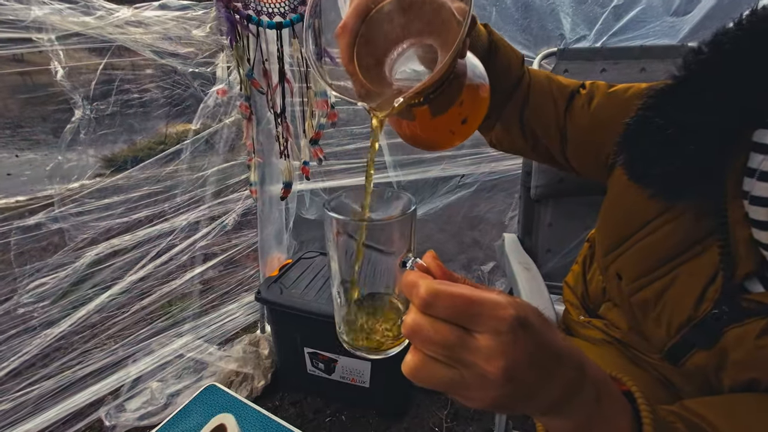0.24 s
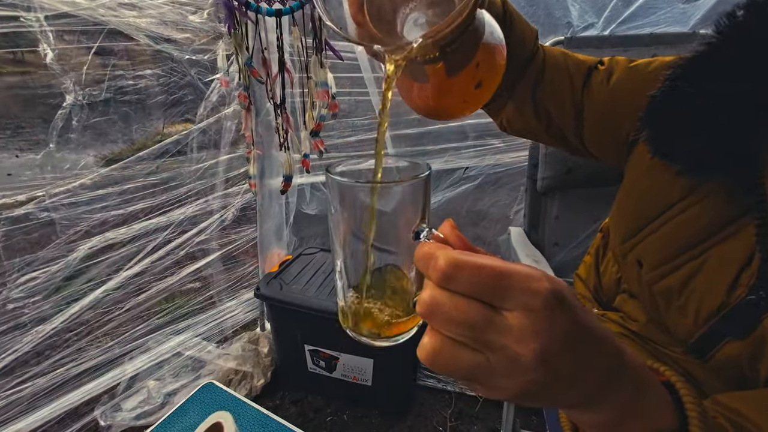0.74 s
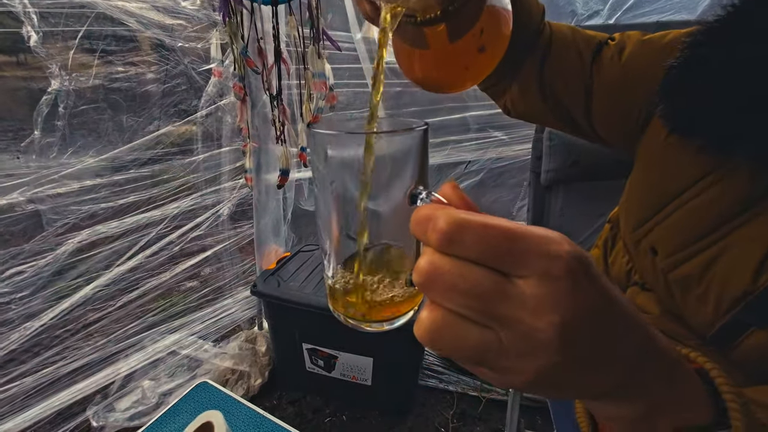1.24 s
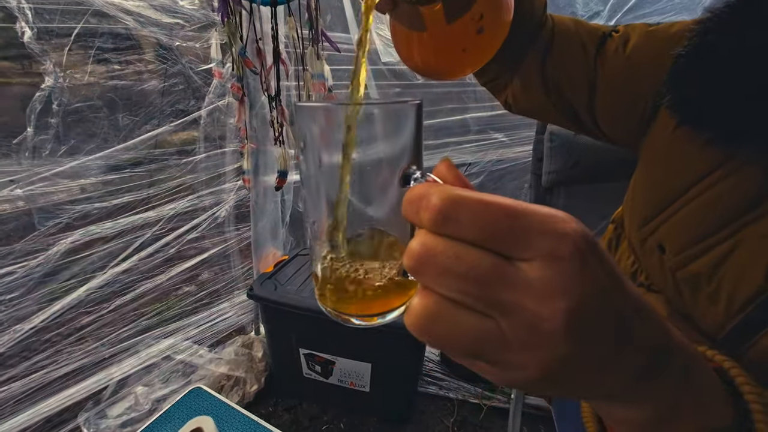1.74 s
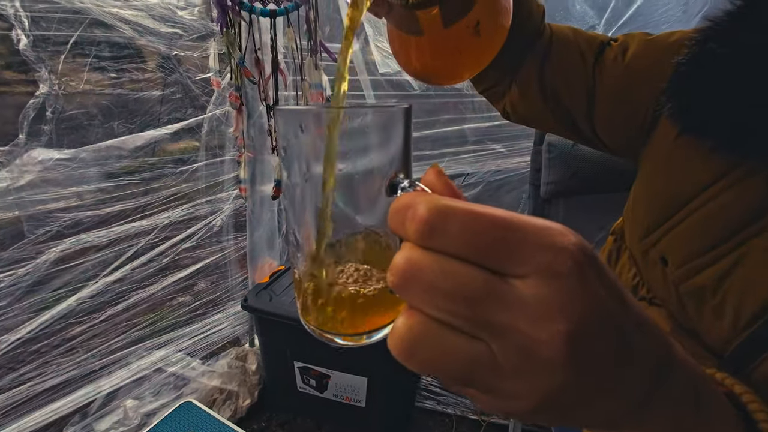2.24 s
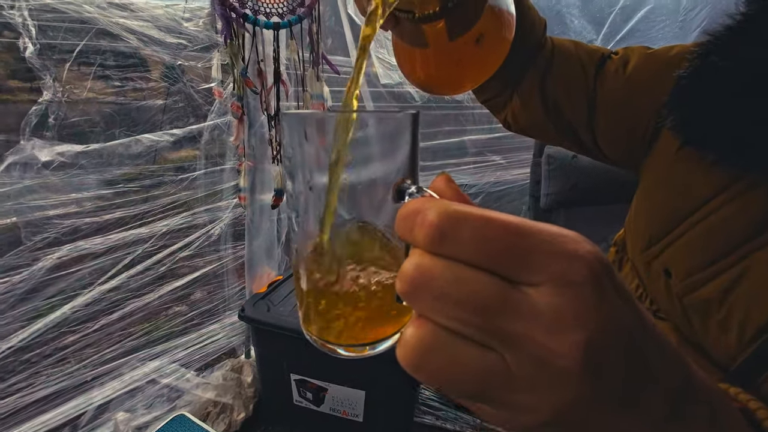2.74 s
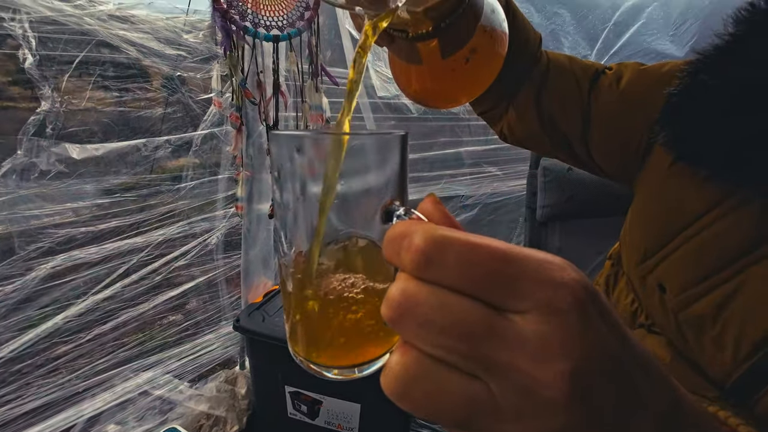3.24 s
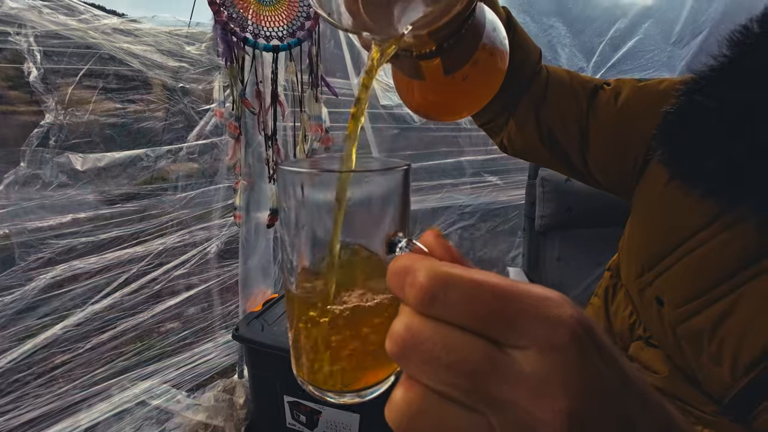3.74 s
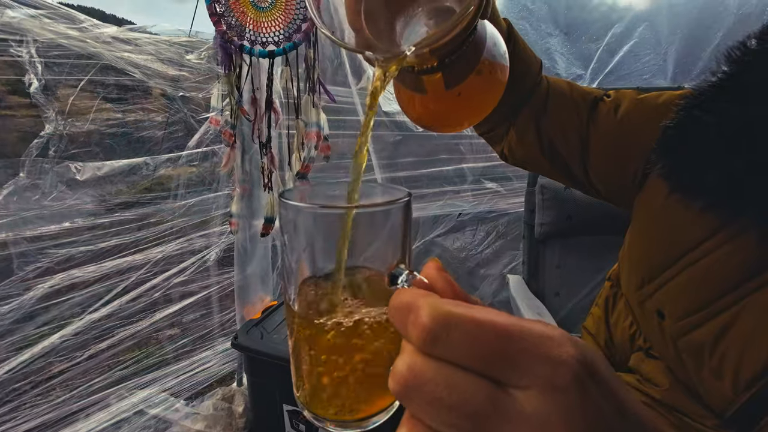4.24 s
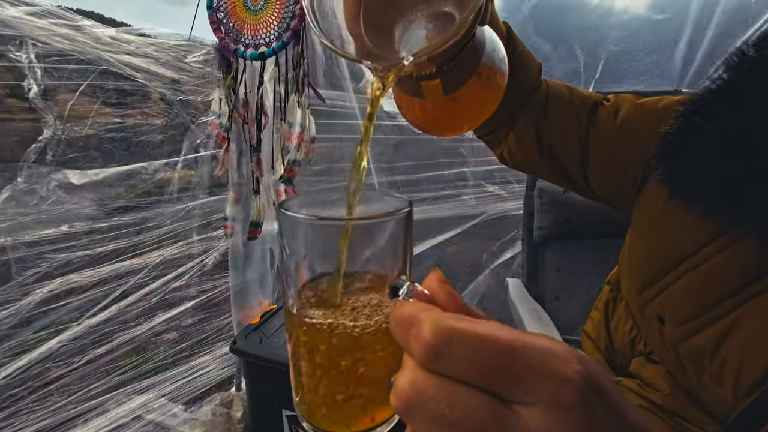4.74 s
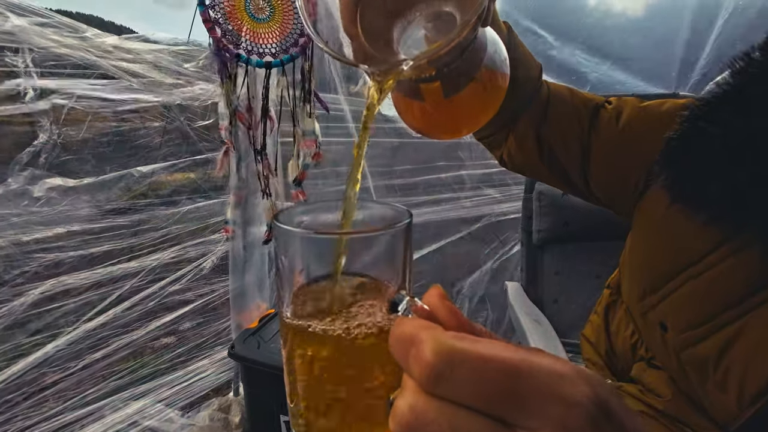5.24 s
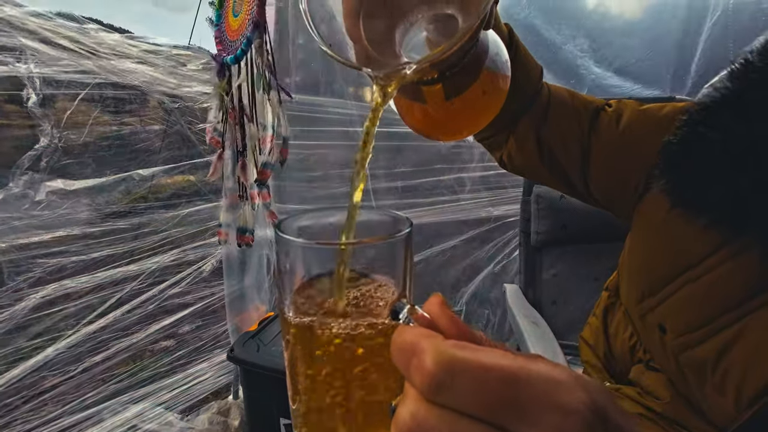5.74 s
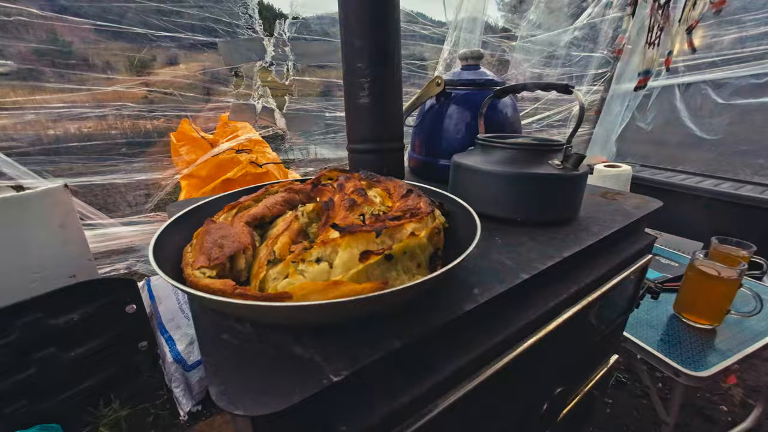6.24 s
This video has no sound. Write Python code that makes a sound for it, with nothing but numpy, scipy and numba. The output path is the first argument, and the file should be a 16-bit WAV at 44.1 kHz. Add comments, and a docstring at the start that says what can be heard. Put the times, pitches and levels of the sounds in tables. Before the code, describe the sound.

A close stream of tea bubbles and splashes into a glass mug over low wind rumble and rustling plastic.

```python
"""Tea pours from a glass pot into a glass mug, in a plastic-sheet shelter, over a low wind rumble. The stream
traps bubbles that ring the air above the tea; its pitch rises as the mug fills. Drops tick throughout the pour,
and at 1.2 s the glass clinks faintly. From about 3 s a gust sets the sheeting rustling, then eddies thump the
microphone. The sheeting snaps taut at 4.6 s. The pouring sounds break off abruptly at 6.3 s; the wind carries
on."""
import sys
import numpy as np
from scipy import signal
from scipy.fft import rfft, irfft, next_fast_len
from scipy.io import wavfile
from numba import njit

SR = 44100
rng = np.random.default_rng(int(sys.argv[2]) if len(sys.argv) > 2 else 0)


def wrap_up_sound(samples):
    """Save the sound to the file named by the first command line argument, as 16-bit audio."""
    columns = np.atleast_2d(samples).T
    # keep every value between -1 and 1, then stretch to whole-number steps
    tamed = np.clip(columns, -1, 1)
    steps = np.round(tamed * 32767).astype(np.int16)
    wavfile.write(sys.argv[1], SR, steps)


N = 286209
TIME_S = np.arange(N) / SR

# wind strength on the shelter: time_s, level_db
WIND_STRENGTH = [(0, 1), (.2, 1.5), (.75, 0.5), (.97, -1), (1.75, -2.5), (2.2, -1.5), (2.58, -2.5),
                 (2.8, 2), (3.03, 7), (3.24, 12.5), (3.56, 4.5), (3.72, 9.5), (4.2, 8.5), (4.5, 13.5),
                 (4.9, 15), (5.5, 14.5), (5.8, 11), (6.14, 13.8), (6.35, 10.5), (6.49, 13)]
# puffs at the microphone: centre_s, rise_db, half_length_s
WIND_PUFFS = [(0.277, 3, 0.067), (0.623, 4, 0.43), (1.6, 4, 0.43), (2.92, 7, 0.09), (3.38, 4.5, 0.16),
              (3.9, 8, 0.12), (4.493, 10, 0.054), (4.895, 9, 0.034), (5.04, 9.5, 0.078),
              (5.375, 4.5, 0.037), (5.885, 6, 0.044), (6.4, 10, .1)]
# noise spectrum shapes: freq_hz, density_db
BUFFET_SPECTRUM = [(2, -25), (9, 0), (16, 2), (25, 0), (39, -2), (50, -7), (75, -13), (120, -25),
                   (300, -55)]
EDDY_SPECTRUM = [(40, 1.5), (80, -11), (120, -2), (180, -6), (280, -9.5), (450, -17), (900, -31.5),
                 (2500, -75)]
ROAR_SPECTRUM = [(150, 0.5), (350, 6), (600, 6.5), (1200, 6), (2000, 0.5), (3000, -2), (5000, -19),
                 (10000, -41.5)]
RUSTLE_SPECTRUM = [(800, -27), (2000, 3), (3200, 2.5), (5000, -0.5), (7000, -1), (10000, -6), (16000, 1.5)]
# stream strength under and above the surface: time_s, churn_db, spray_db
STREAM_STRENGTH = [(0, -50, -47), (.2, -49, -39.5), (.32, -56, -46.5), (.53, -40, -38.5), (.68, -55, -48.5),
                   (.92, -36.5, -38.5), (1.2, -41, -44), (1.55, -36, -46), (1.7, -40, -46.5),
                   (1.8, -51, -53), (2.05, -35.5, -44), (2.25, -39, -41), (2.46, -44.5, -53),
                   (2.66, -39.5, -43), (2.95, -47, -48), (3.56, -42, -49.5), (3.68, -38, -39.5),
                   (4.2, -39.5, -47.5), (4.9, -36, -41), (5.2, -42, -49), (6.25, -38.5, -43.5)]
# lowest resonance of the air above the tea: time_s, pitch_hz
AIR_PITCH = [(0, 714), (.5, 775), (1.4, 859), (2, 866), (2.5, 883), (3, 1060), (4, 1177), (5, 1286),
             (6.3, 1500)]
# quarter-wave modes of that air: pitch_ratio, width_ratio, gain_db
COLUMN_MODES = [(1.002, 0.11, 4.5), (2.92, 0.11, -3), (4.9, 0.49, -14), (6.7, 0.4, -9.5)]
# loudest large bubbles: start_s, level_db, pitch_hz, t60_s
LARGE_BUBBLES = [(0.018, -19.5, 700, 0.031), (0.4954, -21.5, 850, 0.031), (0.5141, -16.5, 770, 0.024),
                 (0.54, -15, 930, .024), (0.5986, -25, 690, .021), (0.8696, -13.5, 756, 0.015),
                 (0.91, -14, 824, 0.024), (0.9456, -15, 730, 0.021), (0.9838, -15, 730, 0.0064),
                 (0.997, -19, 627, .047), (1.035, -19.5, 700, 0.041), (1.058, -19, 733, 0.045),
                 (1.077, -11, 643, 0.021), (1.1126, -19, 800, 0.021), (1.18, -21.5, 650, 0.043),
                 (1.2284, -14.5, 684, 0.016), (1.2569, -26, 730, 0.033), (1.2654, -19.5, 810, 0.021),
                 (1.3215, -14.5, 800, .021), (1.357, -10.5, 767, 0.02), (1.3968, -8.5, 820, 0.01),
                 (1.409, -20, 750, 0.011), (1.4749, -14, 580, 0.056), (1.5596, -14, 704, 0.019),
                 (1.5911, -18.5, 783, 0.015), (1.821, -27, 1160, .013), (1.873, -21, 1020, 0.0056),
                 (1.903, -19, 817, .028), (2.0139, -21.5, 815, 0.027), (2.0567, -22, 790, .015),
                 (2.0742, -23.5, 990, 0.013), (2.1598, -24.5, 626, .032), (2.1879, -18, 790, 0.0084),
                 (2.2155, -20, 593, 0.027), (2.2603, -17.5, 614, 0.037), (2.3452, -22.5, 875, 0.01),
                 (2.3897, -19.5, 816, 0.0033), (2.657, -24.5, 544, 0.039), (3.6367, -23.5, 1030, 0.04),
                 (3.654, -22, 1040, 0.015), (3.681, -23.5, 1020, 0.022), (3.7736, -15, 1320, 0.0036),
                 (3.9158, -27, 1210, 0.015), (4.0245, -24.5, 1103, .054), (4.204, -22, 1300, .013),
                 (4.288, -22.5, 1180, .012), (4.5538, -17.5, 1030, .008), (4.713, -18, 1320, 0.0062),
                 (4.796, -21, 1290, 0.013), (4.9186, -11.5, 1470, .012), (4.953, -25, 1200, .017),
                 (4.995, -21, 1140, 0.009), (5.248, -23.5, 1390, 0.01), (5.3213, -22.5, 1250, .012),
                 (5.4483, -21, 1110, .014), (5.8639, -20.5, 1300, 0.0046), (5.9894, -24, 1490, .011),
                 (6.205, -25, 1390, 0.014), (6.2408, -25, 1480, .014)]
# loudest drops, each with a small bubble: start_s, level_db, pitch_hz
LOUD_DROPS = [(0.036, -13, 7460), (0.0528, -19.5, 2090), (0.0878, -24.5, 1460), (0.102, -28, 1600),
              (0.1757, -17, 5300), (0.198, -19, 2200), (0.375, -23, 1950), (0.4502, -14.5, 2230),
              (0.4792, -13, 4900), (0.5238, -7, 5550), (0.5368, -17, 2430), (0.6013, -13, 2130),
              (0.81, -12.5, 6900), (0.8344, -12, 4950), (0.911, -17, 6680), (0.9232, -16, 4520),
              (0.945, -12, 5800), (0.9599, 0, 7170), (0.9822, -12.5, 4100), (1.0359, -17, 2350),
              (1.0482, -19, 4100), (1.0766, -19, 7500), (1.1158, -13, 7100), (1.142, -10, 2590),
              (1.1696, -16.5, 6800), (1.193, -18, 4870), (1.2283, -17, 2350), (1.2885, -12.5, 7050),
              (1.314, -5, 7150), (1.3218, -11, 2380), (1.342, -17, 5280), (1.357, -12.5, 5600),
              (1.3681, -16.5, 5570), (1.6161, -16, 2650), (1.8192, -22.5, 2430), (2.074, -20.5, 4870),
              (2.1093, -14.5, 6740), (2.1579, -23, 4020), (2.1691, -22, 3800), (2.2122, -17, 6660),
              (2.3487, -23, 2560), (2.39, -17.5, 9400), (2.5876, -24, 2570), (3.6276, -16, 5300),
              (3.6546, -8, 3980), (3.7663, -14, 5870), (3.9176, -14.5, 6070), (4.3098, -15.5, 5900),
              (4.393, -13.5, 5770), (4.587, -9, 7300), (4.5988, -26, 3700), (4.8702, -13.5, 2780),
              (5.1249, -13.5, 2310), (5.1276, -13, 3500), (6.0485, -15, 7500), (6.254, -10.5, 6900),
              (6.2646, -14.5, 2980)]
# single eddies on the microphone: centre_s, level_db, pitch_hz
EDDY_THUMPS = [(3.885, -29, 75), (4.491, -32, 85), (4.905, -20.5, 85), (5.038, -20, 89.7), (5.077, -23, 70),
               (5.349, -25, 124), (5.407, -24, 99), (5.888, -24, 140)]
# microphone response: freq_hz, gain_db
MIC_RESPONSE = [(20, 1.5), (3200, 0.5), (4200, 2), (5400, 5.5), (6900, 1), (7800, 4), (8700, 2.5),
                (9800, 9.5), (10600, -4.5), (11600, -16.5), (12900, -32), (14500, -22.5), (15700, -16.5)]

STREAM_END_S = 6.27


def gain_of(db):
    """Decibels to amplitude."""
    return 10 ** (np.asarray(db) / 20)


def unit_rms(x):
    """Scales to rms one."""
    return x / np.sqrt(np.mean(x ** 2) + 1e-20)


def gain_at(spectrum, hz):
    """Spectrum amplitude at hz, interpolated in log frequency."""
    freq_hz, db = np.transpose(spectrum)
    return gain_of(np.interp(np.log(hz + 1), np.log(freq_hz + 1), db))


def follow(rows, at_s=TIME_S):
    """A curve's columns at the given times."""
    time_s, *columns = np.transpose(rows)
    return [np.interp(at_s, time_s, column) for column in columns]


def add(mix, start_s, sound):
    """Mixes a sound in place."""
    part = mix[max(round(start_s * SR), 0):][:len(sound)]
    part += sound[:len(part)]


def coloured(x, spectrum):
    """Filters by a spectrum; rms one."""
    size = next_fast_len(N)
    gain = gain_at(spectrum, np.fft.rfftfreq(size, 1 / SR))
    return unit_rms(irfft(rfft(x, size) * gain, size)[:N])


def flutter(per_s):
    """Random wobble, rms one."""
    knots = rng.standard_normal(4096)
    return unit_rms(np.interp(TIME_S * per_s, np.arange(len(knots)), knots))


def swell(centre_s, half_s):
    """Gaussian bump, height one."""
    return np.exp(-((TIME_S - centre_s) / half_s) ** 2)


@njit
def one_pole(x, keep):
    """Low-pass with varying memory."""
    out = x.copy()
    for i in range(1, len(x)):
        out[i] = keep[i] * out[i - 1] + (1 - keep[i]) * x[i]
    return out


def resonate(x, pitch_hz, width_hz):
    """Unity-gain resonance; pitch and width may vary."""
    carrier = np.exp(2j * np.pi * np.cumsum(pitch_hz * np.ones(len(x))) / SR)
    keep = np.exp(-np.pi * abs(width_hz) / SR) * np.ones(len(x))
    return 2 * (carrier * one_pole(x / carrier + 1e-18, keep)).real


def wind(buffet_db=-34.5, eddy_db=-46.3, roar_db=-50):
    """Low buffeting at the microphone, lumpy eddies, broad roar outside."""
    gust_db = follow(WIND_STRENGTH)[0]
    puff_db = sum(db * swell(centre_s, half_s) for centre_s, db, half_s in WIND_PUFFS)
    lumps_db = 2 * flutter(per_s=12)
    layers = [(buffet_db - 0.087 * gust_db + puff_db, BUFFET_SPECTRUM),
              (eddy_db + 0.36 * gust_db + 0.18 * puff_db + lumps_db, EDDY_SPECTRUM),
              (roar_db + 0.9 * gust_db, ROAR_SPECTRUM)]
    return sum(gain_of(db) * coloured(rng.standard_normal(N), spectrum) for db, spectrum in layers)


def sheeting(hiss_db=-47, crackle_db=-54, creases_per_s=420, spread_db=5.5, crease_t60_s=0.0016):
    """Billowing plastic hisses and its creases crackle; faint until the gust, which snaps it taut once."""
    flap_db = 11 * swell(centre_s=4.58, half_s=0.032)
    billow_db = 0.8 * flutter(per_s=18) + 2.5 * flutter(per_s=90)
    level = gain_of(follow(WIND_STRENGTH)[0] + flap_db + billow_db)
    hiss = coloured(rng.standard_normal(N), RUSTLE_SPECTRUM)
    creases = rng.random(N) < creases_per_s / SR
    snaps = creases * gain_of(spread_db * np.minimum(rng.exponential(1, N), 3.5))
    keep = np.exp(-np.log(1000) / (crease_t60_s * SR))
    bursts = signal.lfilter([1], [1, -keep], snaps)
    crackle = coloured(bursts * rng.standard_normal(N), RUSTLE_SPECTRUM)
    return level * (gain_of(hiss_db) * hiss + gain_of(crackle_db) * crackle)


def stream(stop_db_per_s=900):
    """Churn and spray gains; both break off abruptly near the end."""
    stop_db = stop_db_per_s * np.clip(TIME_S - STREAM_END_S, 0, 0.1)
    return [gain_of(db - stop_db) for db in follow(STREAM_STRENGTH)]


def bubble(pitch_hz, t60_s, glide=0.12):
    """A bubble rings down, its pitch climbing as it nears the surface."""
    t = np.arange(2048) / SR
    age = t / max(t60_s, 1e-4)
    turns = pitch_hz * (t + glide * t60_s * (age - 1 + np.exp(-age)))
    return np.exp(-np.log(1000) * age) * np.sin(2 * np.pi * turns)


def bubble_cloud(per_s, spread_db, cycles, low_hz, high_hz, tilt_db_per_octave, sizes=32):
    """Bubbles of all sizes, born in clumps as the stream breaks into beads."""
    size, chance, strength = rng.integers(0, sizes, N), rng.random(N), rng.exponential(1, N)
    clumps = unit_rms(gain_of(5 * flutter(per_s=55)))
    births = (chance < clumps * per_s / SR) * gain_of(spread_db * np.minimum(strength, 2.5))
    out = np.zeros(N)
    for k, hz in enumerate(np.geomspace(low_hz, high_hz, sizes)):
        gain = gain_of(tilt_db_per_octave * np.log2(hz / low_hz)) * np.sqrt(hz)
        out += signal.oaconvolve(births * (size == k), gain * bubble(hz, cycles / hz))[:N]
    return out


def mug(x, direct, at_s=TIME_S, shallow_hz=1000, cutoff_hz=430):
    """The air column rings, less as it shortens and leaks; the narrow mouth radiates little bass."""
    air_hz = follow(AIR_PITCH, at_s)[0]
    leak_hz = air_hz * np.maximum(air_hz / shallow_hz, 1) ** 2
    ring = sum(gain_of(db) * resonate(x, pitch_ratio * air_hz, width_ratio * leak_hz)
               for pitch_ratio, width_ratio, db in COLUMN_MODES)
    mouth = signal.butter(2, cutoff_hz, "high", fs=SR, output="sos")
    return signal.sosfilt(mouth, direct * x + ring)


def churn(level_db=-2.3):
    """Faint submerged bubbles, heard through the mug's air."""
    bubbles = bubble_cloud(per_s=420, spread_db=6, cycles=8,
                           low_hz=553, high_hz=3820, tilt_db_per_octave=-2.5)
    return gain_of(level_db) * stream()[0] * unit_rms(mug(bubbles, direct=0.41))


def spray(level_db=-4.5):
    """Tiny droplets crackle on the tea and the glass."""
    droplets = bubble_cloud(per_s=380, spread_db=4, cycles=9,
                            low_hz=1200, high_hz=9500, tilt_db_per_octave=-0.5)
    return gain_of(level_db) * stream()[1] * unit_rms(mug(droplets, direct=0.43))


def gurgle(level_db=-4, per_s=27, jitter=0.36, spread_db=4, spread_octaves=0.42, cycles=14):
    """Each bead of the stream traps a lesser bubble pitched near the air's resonance."""
    out = np.zeros(N)
    for k, (late, strength, detune) in enumerate(rng.uniform(-1, 1, (220, 3))):
        start_s = (k + jitter * late) / per_s
        hz = 1.05 * follow(AIR_PITCH, start_s)[0] * 2 ** (spread_octaves * detune)
        add(out, start_s, gain_of(spread_db * strength) * bubble(hz, cycles / hz))
    return gain_of(level_db) * stream()[0] * unit_rms(mug(out, direct=0.22))


def plops(splash_db=-25.5, splash_t60_s=0.012):
    """Large bubbles drive the air's lowest mode; their splashes wake the upper ones."""
    out, t = np.zeros(N), np.arange(2048) / SR
    for start_s, db, hz, t60_s in LARGE_BUBBLES:
        splash = gain_of(splash_db - 60 * t / splash_t60_s) * rng.standard_normal(len(t))
        ring = mug(bubble(hz, t60_s, glide=0.36) + splash, direct=0.04, at_s=start_s)
        add(out, start_s, gain_of(db) * ring / abs(ring).max())
    return out


def stray_drops(per_s=34, over_spray_db=19, spread_db=3, low_hz=1600, high_hz=8000):
    """Random lesser drops that track the spray: start_s, level_db, pitch_hz."""
    gap, strength, pitch = rng.random((300, 3)).T
    start_s = np.cumsum(2 * gap / per_s)
    level_db = follow(STREAM_STRENGTH, start_s)[1] + over_spray_db + spread_db * (2 * strength - 1)
    pitch_hz = low_hz * (high_hz / low_hz) ** pitch
    return np.transpose([start_s, level_db, pitch_hz])[start_s < STREAM_END_S]


def ticks(level_db=-3, cycles=15.3, smack_db=-3, smack_t60_s=0.003,
          rattle_db=-8, rattle_t60_s=0.022, rattle_delay_s=0.00076):
    """A drop smacks the tea; its bubble snaps, rattles between the glass walls and rings the air."""
    out, t = np.zeros(N), np.arange(1024) / SR
    drops = [*LOUD_DROPS, *stray_drops()]
    noises = rng.standard_normal((400, 2, len(t)))
    for (start_s, db, hz), (walls, impact) in zip(drops, noises):
        snap = gain_of(db + level_db) * bubble(hz, cycles / hz, glide=0.16)
        smack = np.diff(impact * gain_of(-60 * t / smack_t60_s))  # sudden, so rich in treble
        rattle = signal.fftconvolve(snap, walls * gain_of(-60 * t / rattle_t60_s))
        strength = np.linalg.norm(snap)
        add(out, start_s, snap)
        add(out, start_s, gain_of(smack_db) * strength * smack / np.linalg.norm(smack))
        add(out, start_s + rattle_delay_s, gain_of(rattle_db) * strength * rattle / np.linalg.norm(rattle))
    return mug(out, direct=1.0)


def clink(start_s=1.2287, level_db=-27, pitch_hz=8000, t60_s=0.02):
    """The glass rings once, faintly, at a steady pitch."""
    out = np.zeros(N)
    add(out, start_s, gain_of(level_db) * bubble(pitch_hz, t60_s, glide=0))
    return out


def thumps():
    """Each eddy is one pressure push between two shallow dips."""
    out = np.zeros(N)
    for centre_s, db, hz in EDDY_THUMPS:
        phase_squared = np.minimum((np.pi * hz * (TIME_S - centre_s)) ** 2, 20)
        out += gain_of(db) * (1 - 2 * phase_squared) * np.exp(-phase_squared)
    return out


def shelter(x, wet_db=-12, t60_s=0.065, delay_s=0.002):
    """Hand, pot and thin walls scatter a short, weak tail."""
    t = np.arange(8192) / SR
    taps = rng.standard_normal(len(t)) * (rng.random(len(t)) < 0.1) * (t > delay_s)
    tail = taps * gain_of(-60 * t / t60_s)
    return x + gain_of(wet_db) * signal.oaconvolve(x, tail / np.linalg.norm(tail))[:N]


def scene():
    """Close pour plus wind and sheeting; mono."""
    pour = plops() + ticks() + gurgle() + churn() + spray() + clink()
    return (shelter(pour) + wind() + thumps() + sheeting())[None]


def record(dry, cutoff_hz=15900):
    """Minimum-phase microphone response, then a low-pass."""
    log_gain = np.log(gain_at(MIC_RESPONSE, abs(np.fft.fftfreq(4096, 1 / SR))))
    impulse = np.fft.ifft(np.exp(np.conj(signal.hilbert(log_gain)))).real[:1024]
    heard = signal.oaconvolve(dry, impulse[None])[:, :N]
    low_pass = signal.firwin(511, cutoff_hz, window=("kaiser", 9), fs=SR)
    return signal.oaconvolve(heard, low_pass[None], "same")


dry = scene()
out = record(dry)
wrap_up_sound(out)
```